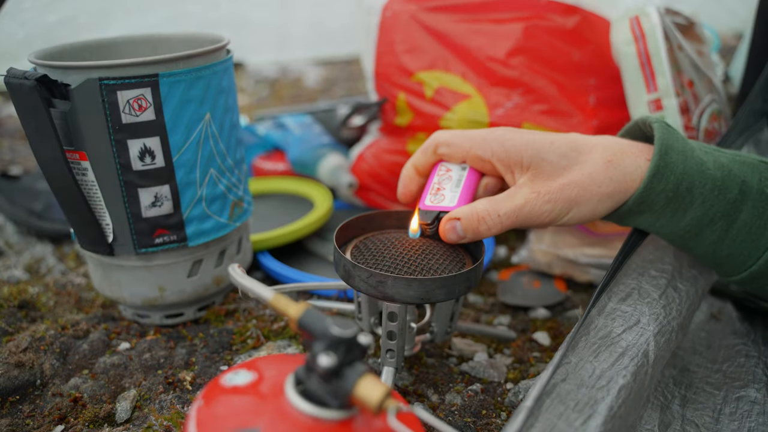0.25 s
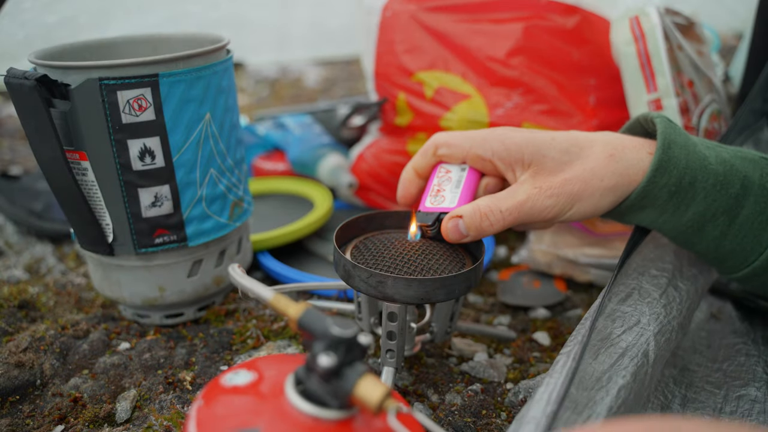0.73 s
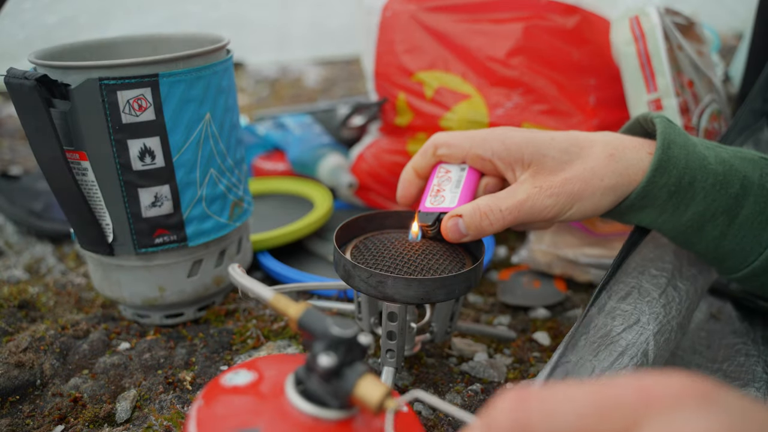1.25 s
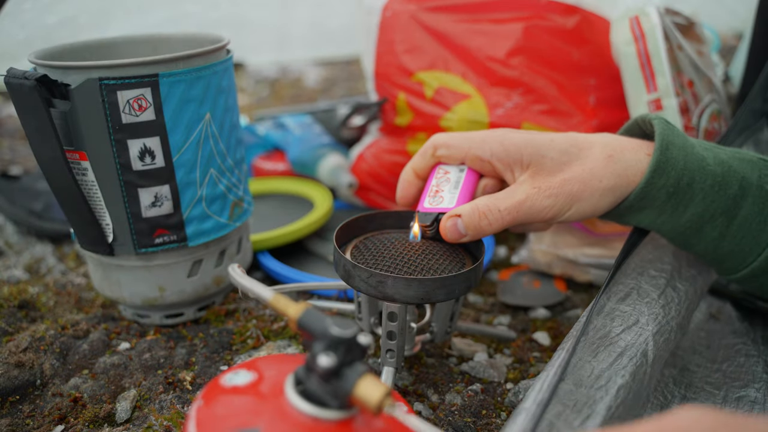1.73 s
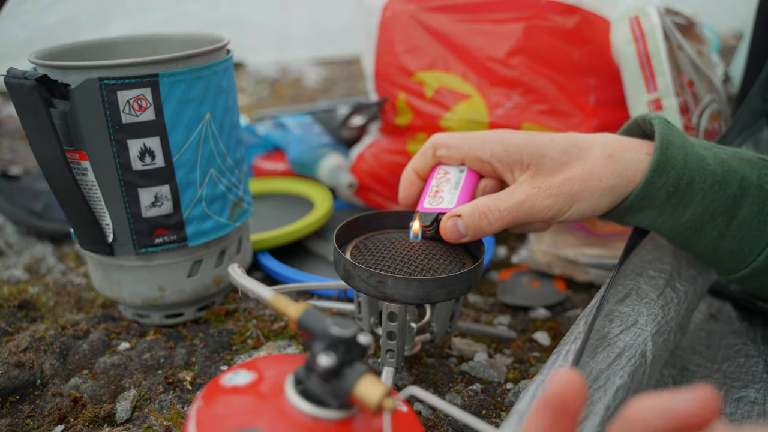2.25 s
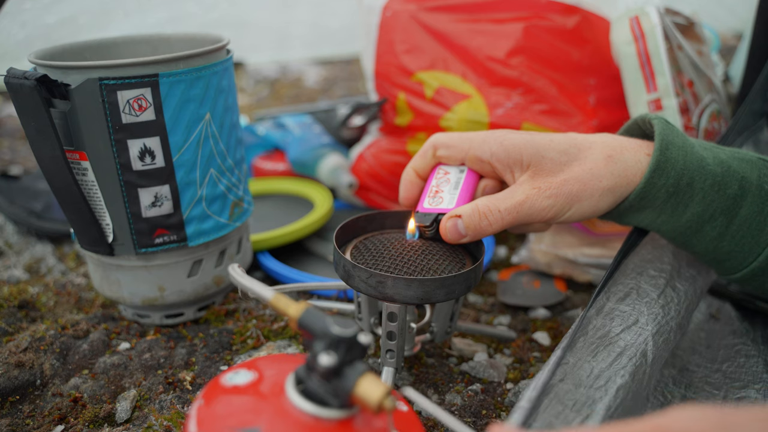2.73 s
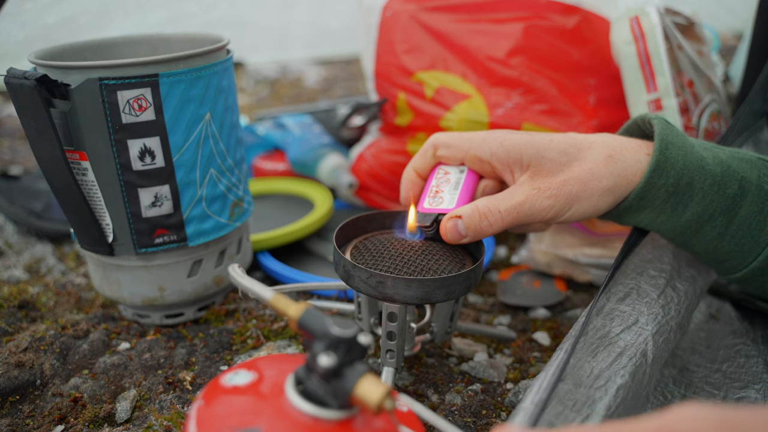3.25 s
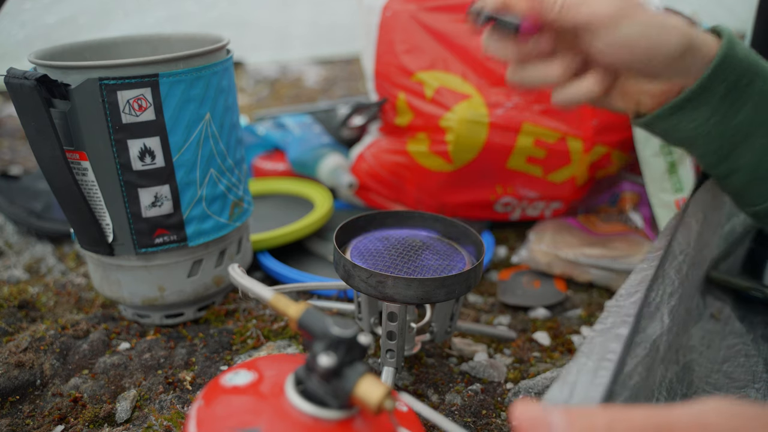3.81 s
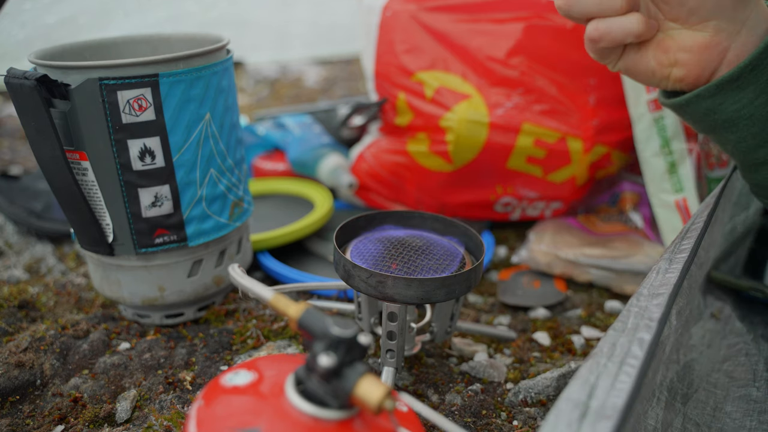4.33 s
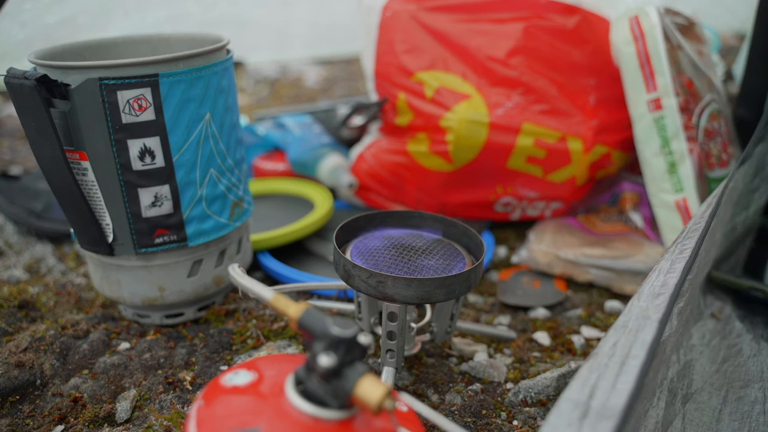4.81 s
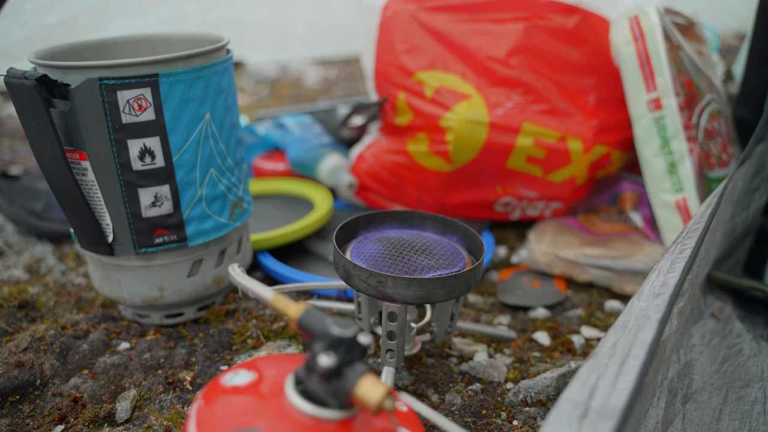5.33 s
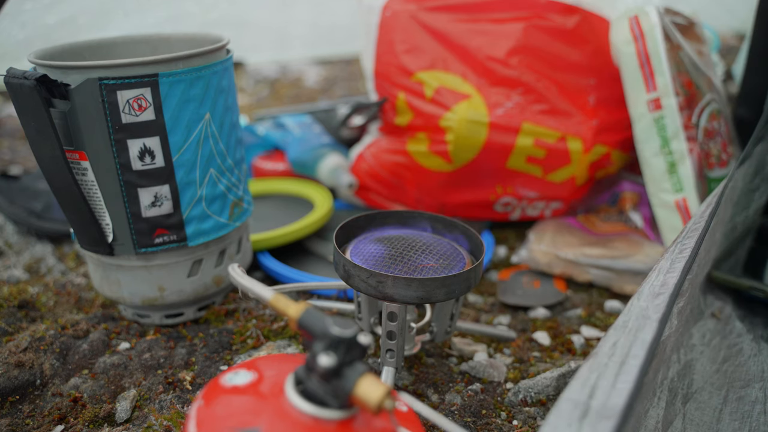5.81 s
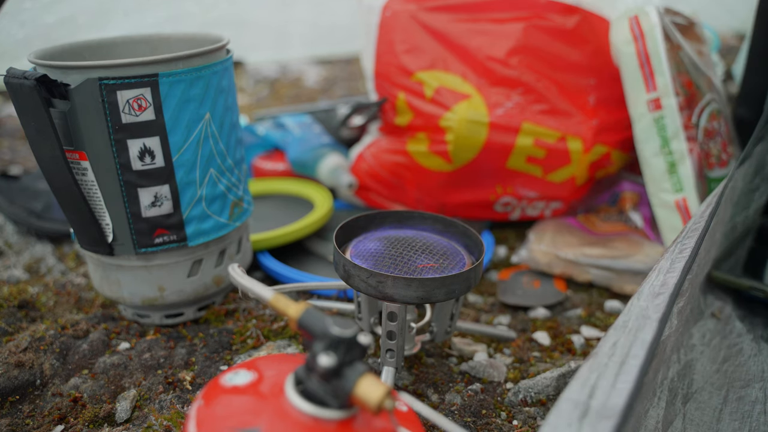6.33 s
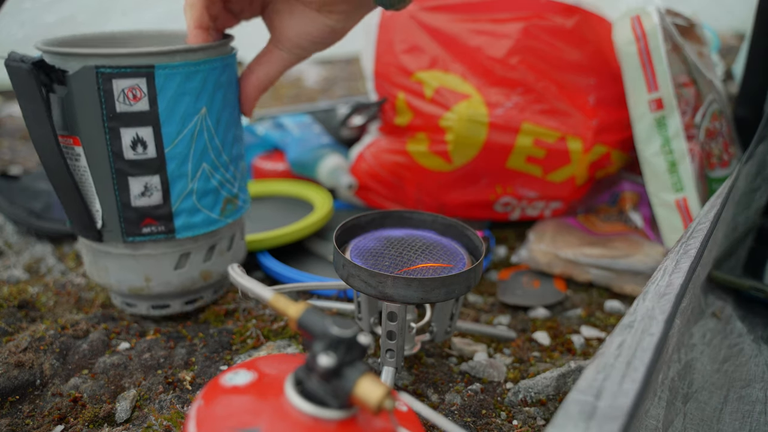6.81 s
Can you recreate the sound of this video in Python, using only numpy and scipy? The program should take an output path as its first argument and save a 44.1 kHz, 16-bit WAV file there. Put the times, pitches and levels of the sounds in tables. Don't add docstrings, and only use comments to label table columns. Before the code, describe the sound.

Throughout the seven seconds, dense steady rain drums on taut tent fabric: a papery midrange patter around one kilohertz, with crisp fine spray above and little bass. Its level wavers only slightly. Larger drops pop out irregularly, notably at 0.6, 1.5, 3.2, 3.75, 5.6 and 5.9 seconds, each a short dull tap with a tiny rebound. Faint ticks come at 0.1, 0.6 and 1.55. At about 3.25 the gas catches and a very quiet low, lumpy roar joins, mostly masked by rain. Lighter clicks fall at 3.73 and 3.86, the second louder and lower. A sleeve brushes cloth from 4.1 to 4.45, with a soft low thump at 4.4, then more slowly from 6.15 to 7. Around 6.6 to 6.9 a thin pot scrapes gently off the ground. Faint microphone rumble comes and goes; the close, dry mono sound ends with rain continuing.

```python
import sys
import numpy as np
from scipy import signal
from scipy.io import wavfile

SR = 44100
rng = np.random.default_rng(int(sys.argv[2]) if len(sys.argv) > 2 else 0)


def wav_out(sig):
    wavfile.write(sys.argv[1], SR, np.round(np.clip(np.atleast_2d(sig).T, -1, 1) * 32767).astype(np.int16))


def ratio(d):
    e = np.asarray(d, float) / 20
    return 10 ** e


N = 311775


def evened(x):
    return x / np.sqrt(np.mean(x ** 2) + 1e-20)


def colour(points):
    f, db = np.transpose([(1, -90)] + list(points) + [(SR / 2, -60)])
    bin_hz = np.abs(np.fft.fftfreq(8192, 1 / SR))
    log_gain = np.log(ratio(np.interp(np.log(bin_hz + 1), np.log(f), db)))
    spectrum = np.exp(np.conj(signal.hilbert(log_gain)))
    taps = np.fft.ifft(spectrum).real[:4096]
    return taps / np.linalg.norm(taps)


def through(x, taps):
    return signal.oaconvolve(x, taps)[:len(x)]


def high(x, hz):
    return signal.sosfilt(signal.butter(2, hz, "high", fs=SR, output="sos"), x)


def ring(x, hz, width):
    return signal.lfilter(*signal.iirpeak(hz, hz / width, SR), x)


def curve(rows, axis):
    rows = np.array(rows)
    return np.interp(np.arange(N) / SR, rows[:, 0], rows[:, axis])


def flutter(hz):
    slow = signal.butter(2, hz, fs=SR, output="sos")
    return evened(signal.sosfilt(slow, rng.standard_normal(N)))


def swell(start, rise, hold, fall):
    return np.interp(np.arange(N) / SR, np.cumsum([start, rise, hold, fall]), [0, 1, 1, 0])


def gesture(start, rise, hold, fall, db):
    shape = swell(start, rise, hold, fall)
    return (shape > 0) * ratio(db - 16 * (1 - shape))


def bumps(rows):
    t = np.arange(N) / SR
    return sum(db * np.exp(-.5 * (2 * (t - s) / length) ** 2) for s, db, length in rows)


def add(mix, s, sound):
    part = mix[max(round(s * SR), 0):][:len(sound)]
    part += sound[:len(part)]


def drops(per_s, spread_db, splat_s):
    size = ratio(spread_db * np.minimum(rng.exponential(1, N), 3))
    hits = size * (rng.random(N) < per_s / SR)
    power = signal.lfilter([1], [1, -np.exp(-2 / (splat_s * SR))], hits ** 2)
    return evened(np.sqrt(power) * rng.standard_normal(N))


# start_s, level_db
RAIN_LEVEL = [(0.0, -35.5), (0.3, -34), (1.0, -34.5), (2.15, -34.5), (2.3, -35.5), (2.6, -35), (3.2, -34.5),
              (3.6, -34.5), (3.8, -33.5), (4.7, -34), (5.12, -33), (6.1, -34.5), (6.6, -33), (6.85, -33),
              (7.03, -35.5), (7.07, -33.5)]
# frequency_hz, density_db (per Hz)
TENT_CLOTH = [(100, -54), (160, -31), (230, -21), (430, -8), (750, -3), (1100, -0.87), (1420, -1.5),
              (1650, -4.5), (3150, -7.5), (3700, -10.5), (6400, -20.5), (8100, -26), (12900, -26.5),
              (15700, -36.5)]
# start_s, rise_s, hold_s, fall_s, boost_db
SLACK_SNAP = (4.35, .065, .02, .02, 2.2)


def rain():
    far = rng.standard_normal(N) * ratio(.3 * flutter(hz=30))
    near = drops(per_s=1500, spread_db=3.0, splat_s=.0015) * ratio(.5 * flutter(hz=35))
    fine = drops(per_s=1800, spread_db=5.0, splat_s=.00094) * ratio(1.87 * flutter(hz=22))
    spray = drops(per_s=2500, spread_db=9.5, splat_s=.0008) * ratio(1.5 * flutter(hz=26))
    drive = far + ratio(-2.5) * near
    drive += ratio(-2.0) * ring(fine, 5600, 7700)
    drive += ratio(-10) * high(spray, 7600)
    *snap_shape, snap_db = SLACK_SNAP
    level_db = curve(RAIN_LEVEL, axis=1) + snap_db * swell(*snap_shape)
    return ratio(level_db) * evened(through(drive, colour(TENT_CLOTH)))


# start_s, peak_db, pitch_hz
BIG_DROPS = [(0.439, -40, 1040), (0.625, -19, 1280), (0.821, -29, 980), (0.927, -25, 1240),
             (1.49, -23, 1400), (1.723, -33, 1010), (1.941, -25, 1040), (2.665, -33, 1190),
             (2.87, -33, 1180), (3.503, -23, 1060), (3.753, -20, 1100), (4.423, -25, 894),
             (4.477, -28, 1500), (4.673, -28, 840), (4.95, -26, 703), (5.487, -33, 1690), (5.57, -22, 778),
             (5.759, -31, 1410), (5.943, -21, 1270), (6.152, -22, 1110), (6.247, -30, 1190),
             (6.347, -24.5, 821), (6.938, -28, 1150), (7.052, -30, 1220)]
# start_s, peak_db, pitch_hz
HEAVY_DROP = (3.19535, -19, 1500)


def big_drops():
    out, t = np.zeros(N), np.arange(500) / SR
    loudest_db = -22
    hits = [(s, min(db, loudest_db), hz) for s, db, hz in BIG_DROPS]
    for s, db, hz in hits + [HEAVY_DROP]:
        dent = np.sin(2 * np.pi * hz * t) * np.exp(-.5 * ((t * hz - 1) / .44) ** 2)
        splash = ring(rng.standard_normal(len(t)), 3500, 3000) * (t / .001) * np.exp(-t / .00085)
        dent += .2 * splash
        add(out, s, ratio(db) * dent)
        add(out, s + .0024, ratio(db - 9) * dent)
    return high(out, 300)


# start_s, peak_db, pitch_hz, t60_s
TICKS = [
    (.104, -43, 8000, .015),
    (.6, -43, 8000, .02),
    (1.556, -43, 8000, .02),
    (3.7305, -41, 10500, .04),
    (3.8602, -37, 7000, .018),
    (4.252, -41, 8000, .015),
    (4.675, -44, 8000, .02),
    (5.25, -43, 8000, .02),
]


def ticks():
    out, t = np.zeros(N), np.arange(900) / SR
    for s, db, hz, t60 in TICKS:
        burst = evened(ring(rng.standard_normal(len(t)), hz, 6500))
        onset = 1 - np.exp(-t / .0004)
        add(out, s, ratio(db - 1.5 - 60 * t / t60) * burst * onset)
    return out


# start_s, rise_s, hold_s, fall_s, level_db
STROKES = [
    (4.12, .22, .08, .05, -47),
    (6.15, .55, 0.16, .15, -44),
]
# frequency_hz, density_db (per Hz)
SLEEVE_CLOTH = [(150, -11), (450, 1.5), (1100, -14), (1750, -8), (2500, -7), (4000, -20), (7000, -13.5),
                (13000, -17.5), (15600, -21)]


def sleeve():
    slips = through(drops(per_s=5300, spread_db=3.5, splat_s=.0006), colour(SLEEVE_CLOTH))
    stroke = sum(gesture(*row) for row in STROKES)
    return stroke * evened(slips)


# start_s, rise_s, hold_s, fall_s, level_db
DRAG = (6.6, .11, .08, .1, -40.5)


def pot():
    scrape = drops(per_s=2500, spread_db=3.0, splat_s=.001)
    wall = ring(ring(scrape, 1750, 350), 1750, 600)
    return gesture(*DRAG) * evened(wall)


# start_s, peak_db, ring_db
KNOCKS = [
    (1.602, -60, -72),
    (3.884, -50, -60),
    (4.058, -51, -66),
    (4.402, -47, -42.5),
    (6.559, -56, -68),
    (6.82, -56, -64),
]
# frequency_hz, level_db, t60_s
STRUCK_MODES = [(81, -4, .8), (128, 2, .4), (190, -6, .2), (237, -6, .2), (360, -2, .12)]


def knocks():
    out, t = np.zeros(N), np.arange(SR) / SR
    thud = np.sin(2 * np.pi * 220 * t) * np.exp(-t / .0018) * (1 - np.exp(-t / .0012))
    thud = high(thud, 70)
    hum = sum(ratio(db - 60 * t / t60) * np.sin(2 * np.pi * hz * t) for hz, db, t60 in STRUCK_MODES)
    hum *= 1 - np.exp(-t / .01)
    for s, db, ring_db in KNOCKS:
        add(out, s + .007, ratio(db + 19.0) * thud)
        add(out, s + .017, ratio(ring_db) * hum)
    return out


# frequency_hz, width_hz, level_db
MOUNT_MODES = [(88.2, 6.8, 1), (99.5, 11.6, -3.5), (130.8, 7.6, -3)]
# start_s, boost_db, length_s
NUDGES = [(.02, 9, 0.093), (.21, 10, .12), (1.2, 6, .3), (2.58, 3, .25), (3.5, 8, .12), (3.8, 8, .25),
          (5.2, 4, 0.2), (5.51, 9, .1), (6.7, 6.5, .4), (7.03, 7, .08)]
# start_s, boost_db, length_s
PUSHES = [(.37, 13, .2), (.7, 12, .4), (1.26, 9, .15), (2.75, 4, .4), (4.55, 18, .15), (4.75, 16, .2),
          (5.47, 13, .2), (6.52, 10, .12), (6.85, 11, .2)]


def mount():
    noise = rng.standard_normal((2, N))
    shake = sum(ratio(db) * ring(ring(noise[0], hz, width), hz, 3.2 * width)
                for hz, width, db in MOUNT_MODES)
    sway = ring(ring(noise[1], 18, 6.7), 18, 14)
    rest_shake_db, rest_sway_db = -69, -79.5
    shaking = ratio(rest_shake_db + bumps(NUDGES)) * evened(shake)
    return shaking + ratio(rest_sway_db + bumps(PUSHES)) * evened(sway)


# start_s, boost_db, length_s
DRAUGHTS = [
    (.2, 8, .25),
    (1.2, 10, .3),
    (4.5, 7.5, 0.23),
    (5.05, 4.5, .3),
    (6.75, 6, 0.48),
]


def flame_db():
    unlit_db, lit_db = -75.5, -61.5
    light_s, catch_s = 3.24, .3
    lit = np.clip((np.arange(N) / SR - light_s) / catch_s, 0, 1)
    return unlit_db + (lit_db - unlit_db) * lit + bumps(DRAUGHTS)


# frequency_hz, density_db (per Hz)
ROAR = [(40, -28), (120, -12), (200, -2.5), (300, -1), (600, -13)]
# frequency_hz, density_db (per Hz)
STILL_AIR = [(40, 3), (55, 7), (70, -15), (160, -6), (250, -2)]


def burner():
    roar = evened(through(rng.standard_normal(N), colour(ROAR))) * ratio(2.2 * flutter(hz=7))
    air = evened(through(rng.standard_normal(N), colour(STILL_AIR)))
    return ratio(flame_db()) * roar + ratio(-76.0) * air


def scene():
    mix = rain() + big_drops() + ticks() + sleeve() + pot() + knocks() + mount() + burner()
    return mix[None]


def roll_off(x):
    return signal.sosfilt(signal.butter(12, 15720, fs=SR, output="sos"), x)


def record(dry):
    return roll_off(dry)


dry = scene()
out = record(dry)
wav_out(out)
```